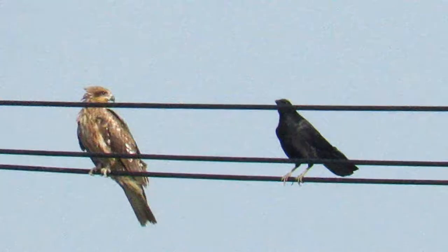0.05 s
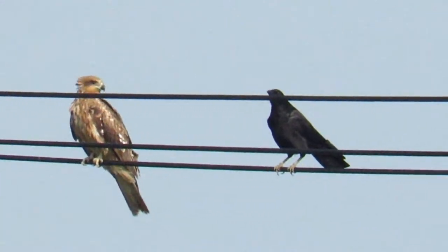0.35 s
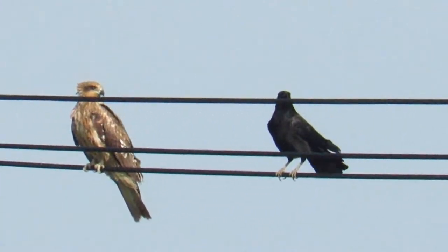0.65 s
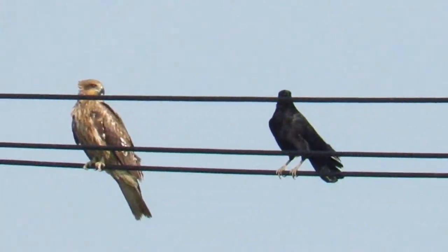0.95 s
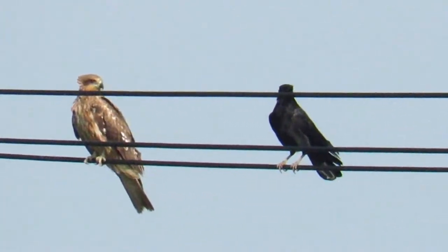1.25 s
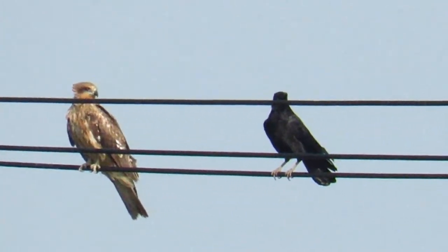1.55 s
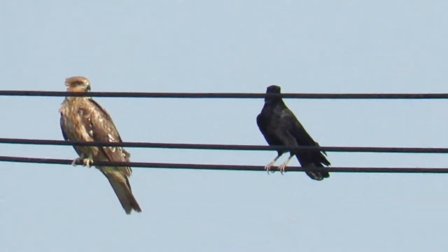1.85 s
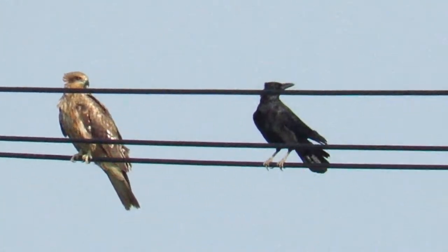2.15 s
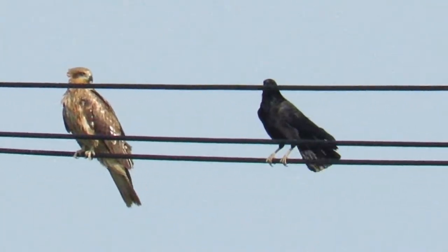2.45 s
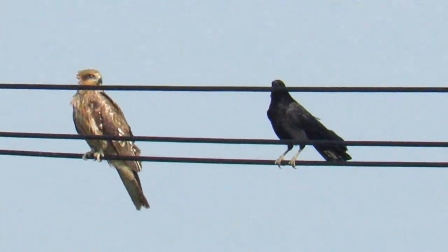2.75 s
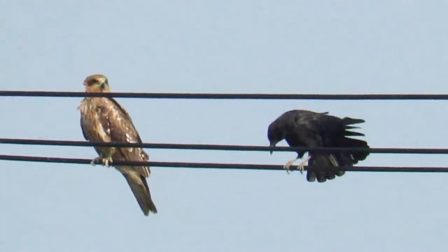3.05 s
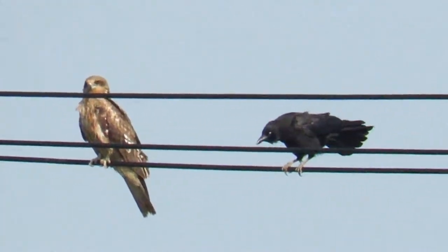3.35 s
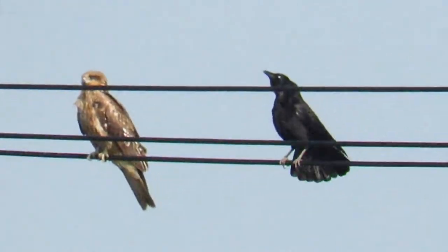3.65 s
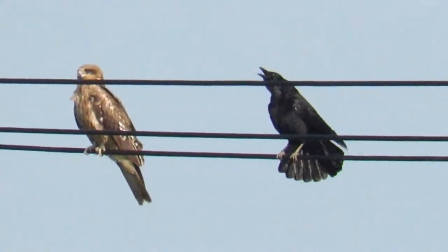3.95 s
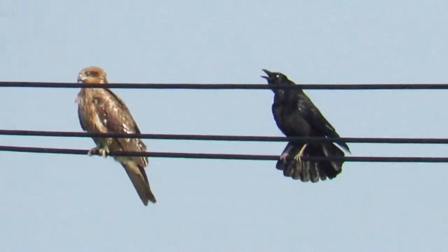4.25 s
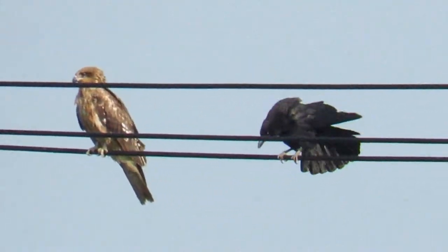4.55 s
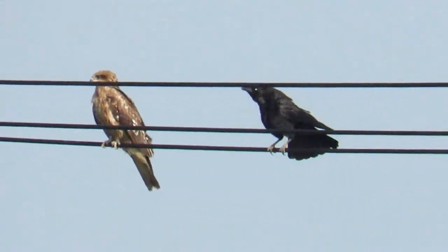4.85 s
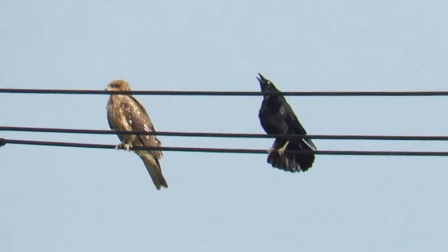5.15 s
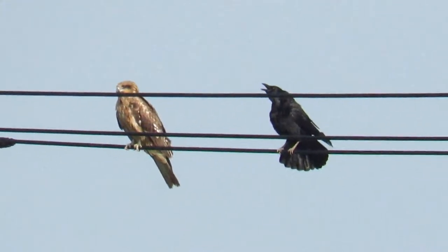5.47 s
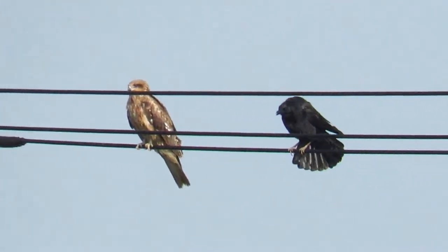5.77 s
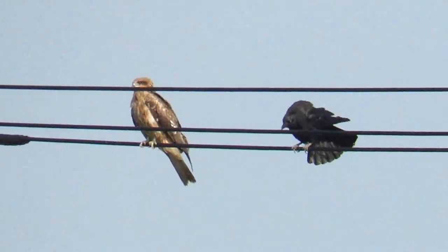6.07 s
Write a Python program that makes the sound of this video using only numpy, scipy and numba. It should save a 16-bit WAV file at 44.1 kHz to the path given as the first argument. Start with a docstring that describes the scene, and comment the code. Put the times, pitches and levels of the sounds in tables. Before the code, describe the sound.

Low, gusty wind rumbles on the microphone throughout, over a faint wash of distant town and a steady hiss. Hard buffets thump near 1, 1.5 to 2, 3, 3.7, 4.3 and 6 seconds, briefly ducking everything else. From the start a swallow twitters in quick, gliding whistles and trills, while another small bird repeats a thin, high buzz about every half second until 3.7 seconds, and once more near the end. Around 3 seconds the swallow grows louder with three rising whistles, followed by chips and raspy notes. At 4.3 seconds, as the song fades, a crow gives a harsh, rattling caw about half a second long, with a light outdoor echo. A sharp click comes at 5.4 seconds. A second, softer caw follows at 5.6 seconds, with two faint, distant falling whistles at about 5.6 and 6.1 seconds.

```python
"""Wind rumbles on the microphone over a distant town's wash; its hardest buffets duck the gain control.
From the start a swallow twitters in gliding whistles and another small bird repeats a thin buzz.
Near 3 s the song climbs to rising whistles. At 4.3 s, as it fades, a crow on a power line gives a long
rattling caw: syrinx pulses ringing its throat. A click at 5.4 s, then a second caw and two far whistles."""
import sys
import numpy as np
from scipy import signal
from scipy.fft import rfft, irfft, next_fast_len
from scipy.io import wavfile
from scipy.ndimage import uniform_filter1d, minimum_filter1d
from numba import njit

SR = 44100
rng = np.random.default_rng(int(sys.argv[2]) if len(sys.argv) > 2 else 0)


def generate_wav(signal):
    """Clip the signal to [-1, 1] and save it as 16-bit WAV at the path in sys.argv[1]."""
    frames = np.transpose(np.atleast_2d(signal))
    scaled = np.clip(frames, -1, 1) * 32767
    pcm = np.round(scaled).astype(np.int16)
    wavfile.write(sys.argv[1], SR, pcm)


N = 273861
TIME = np.arange(N) / SR


def caw(start_s, length_s, full_rate_hz, level_db):
    """Uneven syrinx pulses, swelling with each rattle, ring the throat as the beak opens."""
    pitch_swing, jitter, roughness = .044, .07, .35
    attack_s, release_s = .014, .028
    stop_s = start_s + length_s + release_s
    on = (TIME > start_s) & (TIME < stop_s)
    t, out = TIME[on], np.zeros(N)
    rattle_hz, depth_db, throat_hz, effort_db = caw_gesture(t - start_s, length_s, full_rate_hz)
    rattle = np.cos(2 * np.pi * (np.cumsum(rattle_hz) / SR - .3 + .06 * drift(40, t)))
    pitch_hz = np.interp(throat_hz, [1120, 1400], [360, 310])   # sags as the throat opens
    strain = np.sqrt(np.maximum(depth_db, 0) / 10)   # deeper rattle, less regular pulses
    cycles = np.cumsum(pitch_hz * (1 + pitch_swing * rattle + jitter * strain * drift(350, t))) / SR
    pulses = rms_one(np.diff(np.floor(cycles), prepend=0) * from_db(2 * drift(300, t)))
    rasp = rms_one(rng.standard_normal(len(t)) * np.exp(-3 * (cycles % 1)))
    source = (pulses + roughness * strain * rasp) * from_db(depth_db * rattle / 2)
    throat = from_db(10) * resonate(source, throat_hz, width_hz=280)
    voice = band(source + throat, 950, 1830, order=4)
    voice += from_db(-3) * formant(source, throat_hz + 1200, width_hz=480)
    voice += from_db(-27) * band(source, 1200, 5500)
    voice /= np.sqrt(uniform_filter1d(voice ** 2, size=1700) + 1e-12)
    edges = np.clip(np.minimum((t - start_s) / attack_s, (stop_s - t) / release_s), 0, 1)
    out[on] = voice * from_db(level_db + effort_db) * edges
    return out


def caw_gesture(t, length_s, full_rate_hz):
    """The rattle speeds up and deepens as the beak opens; the beak part closes and the tone clears."""
    first_rate_hz, speed_up_s = 26, .08
    opening_s, closing_s, clear_end_s = .26, .14, .035
    shut_depth_db, open_depth_db = 4.5, 10.5
    shut_hz, open_hz = 1072, 1448
    opening = np.sin(np.pi / 2 * np.clip(t / opening_s, 0, 1))
    closing = np.clip(1 + (t - length_s) / closing_s, 0, 1)
    rattling = np.clip((length_s - t) / clear_end_s, 0, 1)
    accent_db = 4 * np.exp(-t / .015)
    rattle_hz = full_rate_hz + (first_rate_hz - full_rate_hz) * np.exp(-t / speed_up_s)
    depth_db = shut_depth_db + (open_depth_db - shut_depth_db) * opening ** 2 + accent_db
    throat_hz = shut_hz + (open_hz - shut_hz) * (opening - .25 * closing)
    effort_db = accent_db - 3 * opening ** 2 + 2 * closing * rattling   # softer wide open, last push
    return rattle_hz, depth_db * rattling, throat_hz, effort_db


def crow():
    """Two caws, the second softer."""
    # caws: (start [s], length [s], full rattle rate [Hz], level [dB])
    caws = [(4.276, .534, 55.7, -27.5), (5.598, .547, 56.9, -32.5)]
    return sum(caw(*row) for row in caws)


def swallow(notes, edge_s=.0029, waver_hz=40, ragged=.155, downstroke_db=3.5, flutter_db=1.5):
    """Pure whistles gliding through uneven pitch arches; multi-arch notes are louder on the way down."""
    # throat response: (frequency [Hz], gain [dB])
    throat = [(2400, -29), (3100, -14.5), (4000, 0.5), (4500, -9), (5200, -13.5), (6500, -20)]
    out = np.zeros(N)
    for start_s, length_s, from_hz, to_hz, arch_hz, arches, db in notes:
        on = (TIME > start_s) & (TIME < start_s + length_s)
        t = TIME[on]
        progress = (t - start_s) / length_s
        turn = np.pi * round(arches) * progress
        arch = abs(np.sin(turn)) * (1 + ragged * drift(49.7, t))
        hz = from_hz + (to_hz - from_hz) * progress + arch_hz * arch + waver_hz * drift(470, t)
        falling = -np.sign(arch_hz) * np.sin(2 * turn) * (round(arches) > 1)
        level_db = db + downstroke_db * falling + flutter_db * drift(120, t)
        edges = np.clip(np.minimum(progress, 1 - progress) * length_s / edge_s, 0, 1)
        out[on] += from_db(level_db) * gain_at(throat, hz) * edges * whistle(hz)
    return out


def song_notes():
    """The swallow's song; the notes of a syllable run back to back."""
    # song: (start [s], syllable, relative level [dB])
    song = [(0.075, "peep", -32.5), (.185, "drop", -38), (.343, "trill", -43), (.523, "warble", -33.5),
            (.755, "drop", -41), (1.356, "warble", -37.5), (2.206, "tumble", -33), (2.314, "plunge", -34),
            (2.498, "stutter", -39.5), (2.626, "ripple", -28.5), (2.89, "rise", -25.5),
            (3.059, "rise", -27), (3.243, "rise", -26.5), (3.433, "flick", -33.5), (3.478, "flick", -31.5),
            (3.556, "flick", -32), (3.601, "flick", -30), (3.69, "chip", -27.5), (3.711, "chip", -22.5),
            (3.772, "hook", -26), (3.889, "rasp", -25.5), (4.087, "stutter", -28), (4.157, "dip", -28.5),
            (4.249, "rasp", -26.5), (4.483, "tumble", -36.5), (4.566, "chip", -35.5), (4.608, "dip", -33.5),
            (4.643, "stutter", -39), (4.777, "tumble", -38.5), (4.853, "chip", -37), (4.884, "chip", -32),
            (5.223, "chip", -35), (5.289, "hook", -38)]
    # notes per syllable: (length [s], from [Hz], to [Hz], arch height [Hz], arches [count])
    syllables = { "drop": [(.038, 4290, 2760, 454, 1)], "plunge": [(.04, 4900, 5000, 32, 1),
                 (.04, 4680, 2620, -550, 1)], "peep": [(.04, 3030, 3000, 80, 1)],
                 "chip": [(.027, 3100, 3480, 594, 1)], "trill": [(.136, 2840, 3020, 1020, 5)],
                 "warble": [(.151, 6730, 6970, -1350, 4)], "stutter": [(.064, 3290, 3310, 950, 4)],
                 "tumble": [(.075, 4470, 3610, 993, 3)], "ripple": [(.056, 3860, 4700, 905, 2),
                 (0.051, 5290, 4500, 260, 1), (.097, 5190, 5000, -900, 9)],
                 "rise": [(.123, 3060, 5900, -340, 1)], "flick": [(.035, 4150, 6540, -430, 1)],
                 "hook": [(.025, 5000, 3450, 1450, 1), (.029, 3500, 3950, 1400, 1),
                 (.036, 4200, 4100, -100, 1)], "rasp": [(.032, 3505, 3540, 934, 4),
                 (.113, 2500, 2220, 845, 5)], "dip": [(.054, 5920, 5700, -950, 2)]}
    notes = []
    for start_s, syllable, db in song:
        for length_s, *contour in syllables[syllable]:
            notes.append((start_s, length_s, *contour, db))
            start_s += length_s
    return notes


def chatter_notes(level_db=-40.5, fall_hz=900, arch_hz=850, step_s=.09):
    """Faint tumbling notes in the song's quieter stretches."""
    # chatter spans: (from [s], to [s])
    spans = [(.82, 1.03), (1.201, 1.21), (1.52, 1.86), (2.0, 2.18), (4.95, 5.0), (5.49, 5.55)]
    notes = []
    for begin_s, end_s in spans:
        for slot_s in np.arange(begin_s, end_s, step_s):
            late, stretch, high, loud = rng.uniform(-1.1, 1, size=4)
            hz = 4400 + 400 * high
            contour = (hz + fall_hz / 2, hz - fall_hz, arch_hz, rng.integers(2, 6))
            notes.append((slot_s + .012 * late, .055 + .0157 * stretch, *contour, level_db + 2 * loud))
    return notes


def buzzing_bird(level_db=-38.5, centre_hz=6070, sweep_hz=430, shake_rate_hz=170, scatter_hz=170):
    """A high whistle shaken quickly in pitch, the swing narrowing as it fades."""
    # buzzes: (peak time [s])
    peaks_s = [0.078, 0.427, .809, 1.269, 1.641, 2.198, 2.608, 2.945, 3.293, 3.687, 5.919]
    out = np.zeros(N)
    for peak_s in peaks_s:
        on = abs(TIME - peak_s) < .1
        t = TIME[on] - peak_s
        swing = whistle(shake_rate_hz * (1 + .182 * drift(148.5, t)))
        spread = np.clip(1 - t / .034, .3, 1)
        hz = centre_hz + spread * (sweep_hz * swing + scatter_hz * drift(701.4, t))
        swell = np.exp(-.5 * (t / .032) ** 2) * (1 + .54 * drift(404, t))
        out[on] += from_db(level_db) * swell * whistle(hz)
    return out


def wind(lumps_db=2, trim_db=-1.5, buffet_s=.0045, lull_s=.0077):
    """Lumpy turbulence with rounded crests; a large eddy sweeps it aside and lands as one push."""
    # wind strength: (time [s], level [dB])
    strength = [(0.12, -18.5), (0.26, -26.5), (0.56, -16), (0.7, -28), (0.94, -10), (1.28, -17),
                (1.58, -7.5), (2.26, -5.5), (2.46, -24), (2.78, -8), (3.48, -18.5), (3.76, -5),
                (4.06, -16.5), (4.32, -7.5), (4.38, -11.5), (5.86, -16.5), (6.02, -2), (6.16, -6)]
    # turbulence spectrum: (frequency [Hz], relative density [dB])
    rumble = [(20, -5), (48, 2), (85, -4), (135, -12), (200, -22.5), (320, -35), (600, -53), (2000, -74.5)]
    # hard buffets: (time [s], peak [dB])
    buffets = [(.95, 2), (1.49, 3.7), (1.685, 7.2), (1.92, 9.2), (2.953, 3), (3.70, 6.5), (4.287, 6.5),
               (5.938, 6.3)]
    level_db = in_time(strength)
    turbulence = noise(rumble)
    turbulence /= np.sqrt(uniform_filter1d(turbulence ** 2, size=6000))
    turbulence *= from_db(level_db + trim_db + lumps_db * drift(35, TIME))
    crest = np.maximum(.93, 3 * from_db(level_db))
    out = crest * np.tanh(turbulence / crest)
    for peak_s, db in buffets:
        u = (TIME - peak_s) / buffet_s
        push = from_db(db) * (1 - u * u) * np.exp(-u * u / 2)
        lull = 1 - np.exp(-((TIME - peak_s) / lull_s) ** 2)
        out = out * lull + push
    return out


def click(start_s=5.4233, level_db=-13, decay_s=.0011):
    """One sharp click: a step that sinks back."""
    return from_db(level_db) * (TIME >= start_s) * np.exp(-abs(TIME - start_s) / decay_s)


def far_bird(from_hz=6400, to_hz=4300, fall_s=.11, fade_s=.053):
    """Thin whistles that slide down and die away."""
    # whistles: (start [s], peak [dB])
    calls = [(5.61, -51), (6.079, -48)]
    out = np.zeros(N)
    for start_s, db in calls:
        t = np.maximum(TIME - start_s, 0)
        hz = to_hz + (from_hz - to_hz) * np.exp(-t / fall_s)
        swell = t / fade_s * np.exp(1 - t / fade_s)
        out += from_db(db) * swell * whistle(hz)
    return out


def town(hum_hz=777.3, hum_db=-59):
    """A distant wash that swells and sinks over a faint hum."""
    # wash spectrum: (frequency [Hz], relative density [dB])
    wash = [(150, 0.5), (500, -4), (1000, -2), (1550, -3), (2100, -18), (3000, -17), (6000, -23),
            (12000, -57)]
    # wash swell: (time [s], level [dB])
    swell = [(0, -43), (1.7, -37.5), (2.6, -42), (6.2, -42)]
    hum = rms_one(formant(rng.standard_normal(N), hum_hz, width_hz=17))
    return from_db(in_time(swell)) * noise(wash) + from_db(hum_db) * hum


def microphone_hiss(level_db=-46.5):
    """Self-noise, independent per channel."""
    # hiss spectrum: (frequency [Hz], relative density [dB])
    spectrum = [(200, 5.5), (1000, 10.5), (2500, 3.2), (7000, 3.1), (15000, 0.44)]
    return from_db(level_db) * np.array([noise(spectrum), noise(spectrum)])


def outdoors(x, wet_db, t60_s, count=90):
    """Adds scattered echoes from houses and trees, nearly alike in both channels."""
    delays_s = rng.uniform(.006, .4, count)
    sizes = rng.choice([-1, 1], count) * from_db(-60 * delays_s / t60_s)
    echoes = np.zeros((2, SR))
    echoes[:, (delays_s * SR).astype(int)] = sizes * (1 + .022 * rng.standard_normal((2, count)))
    echoes = band(echoes / np.linalg.norm(sizes), 300, 15000, order=1)
    return x + from_db(wet_db) * signal.fftconvolve(x[None], echoes, axes=1)[:, :N]


def from_db(db):
    return 10 ** (np.asarray(db) / 20)


def rms_one(x):
    return x / np.sqrt(np.mean(x ** 2) + 1e-20)


def whistle(hz):
    return np.sin(2 * np.pi * np.cumsum(hz) / SR)


def in_time(curve):
    return np.interp(TIME, *np.transpose(curve))


def gain_at(spectrum, hz):
    """Linear gain from (frequency [Hz], gain [dB]) rows."""
    points_hz, db = np.transpose(spectrum)
    return from_db(np.interp(np.log(np.maximum(hz, 1)), np.log(points_hz), db))


def band(x, low_hz, high_hz, order=2):
    return signal.sosfilt(signal.butter(order, [low_hz, high_hz], "band", fs=SR, output="sos"), x)


def noise(spectrum):
    """Coloured noise above 16 Hz, rms 1."""
    size = next_fast_len(N, True)
    hz = np.fft.rfftfreq(size, 1 / SR)
    bins = rfft(rng.standard_normal(size)) * gain_at(spectrum, hz) * (hz > 16)
    return rms_one(irfft(bins, size)[:N])


def drift(rate_hz, t):
    """Random wander through rate_hz new values a second."""
    position = (t - t[0]) * rate_hz
    count = int(position[-1]) + 2
    return np.interp(position, np.arange(count), rng.standard_normal(count))


@njit
def resonate(x, hz, width_hz):
    """Resonance with a moving centre, peak gain 1."""
    r, y = np.exp(-np.pi * width_hz / SR), np.zeros(len(x))
    for i in range(2, len(x)):
        drive = (1 - r * r) / 2 * (x[i] - x[i - 2])
        y[i] = drive + 2 * r * np.cos(2 * np.pi * hz[i] / SR) * y[i - 1] - r * r * y[i - 2]
    return y


def formant(x, hz, width_hz):
    """Two resonances in series, for steep sides."""
    hz = hz * np.ones(len(x))
    return resonate(resonate(x, hz, width_hz), hz, width_hz)


def scene(start_s=.078, fade_in_s=.0062):
    """Birds in the open air, with town, hiss, wind and a click; stereo."""
    birds = outdoors(crow(), wet_db=-9.5, t60_s=1.2)
    birds += from_db(1.95) * outdoors(swallow(song_notes() + chatter_notes()), wet_db=-15.5, t60_s=.11)
    birds += outdoors(buzzing_bird(), wet_db=0, t60_s=.049)
    birds += outdoors(far_bird(), wet_db=-4, t60_s=.3)
    fade_in = np.clip((TIME - start_s) / fade_in_s, 0, 1)
    return (birds + town() + microphone_hiss() + wind() + click()) * fade_in


def record(dry):
    """Gain control ducks just ahead of a peak and recovers slowly; a steep low-pass follows."""
    ceiling_db, recovery_db_per_s, cutoff_hz = -.6, 8.5, 15800
    over_db = np.maximum(20 * np.log10(abs(dry).max(axis=0) + 1e-9) - ceiling_db, 0)
    recovery_db = recovery_db_per_s * TIME
    held_db = np.maximum.accumulate(over_db + recovery_db) - recovery_db
    gain_db = uniform_filter1d(minimum_filter1d(-held_db, size=400), size=400)
    low_pass = signal.ellip(12, .1, 80, cutoff_hz, fs=SR, output="sos")
    return signal.sosfilt(low_pass, dry * from_db(gain_db))


dry = scene()
out = record(dry)
generate_wav(out)
```